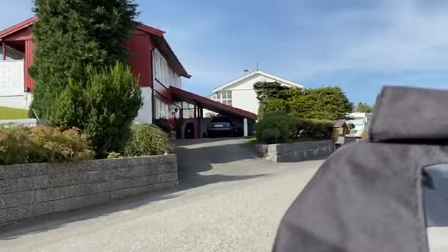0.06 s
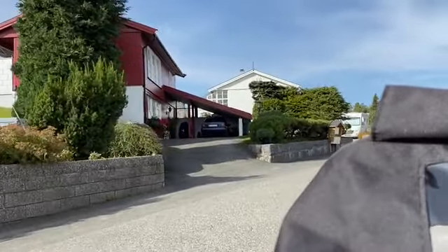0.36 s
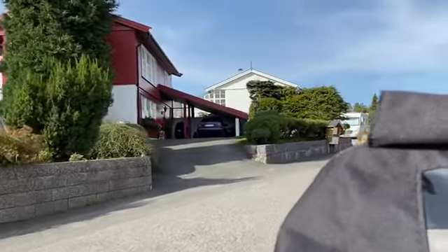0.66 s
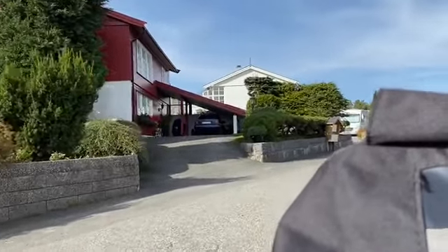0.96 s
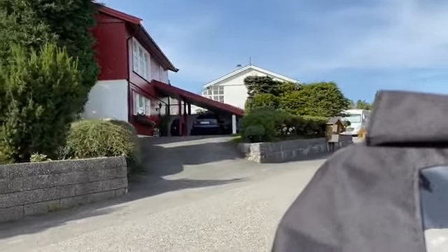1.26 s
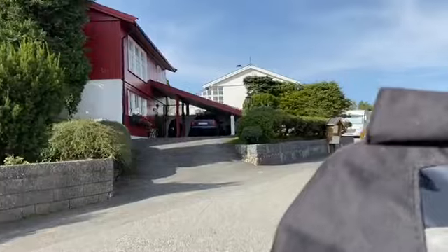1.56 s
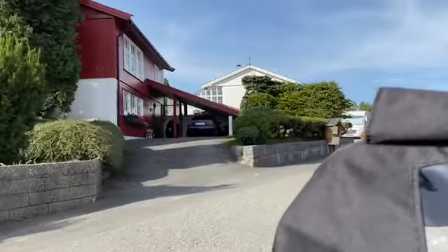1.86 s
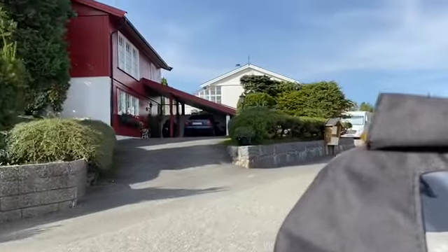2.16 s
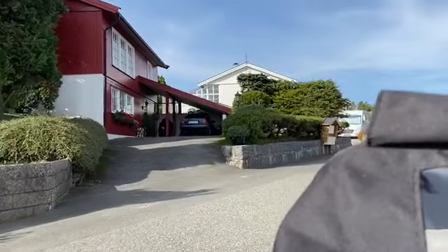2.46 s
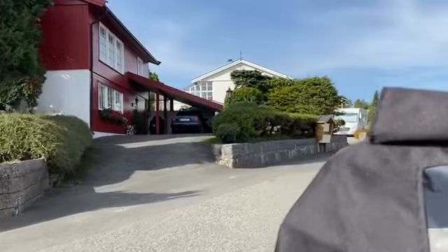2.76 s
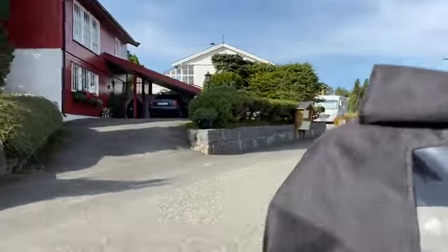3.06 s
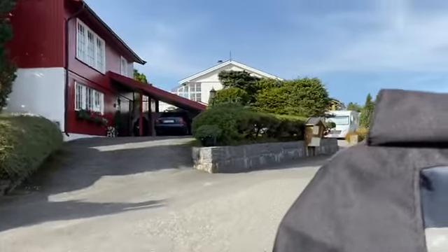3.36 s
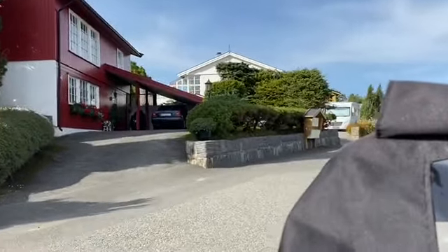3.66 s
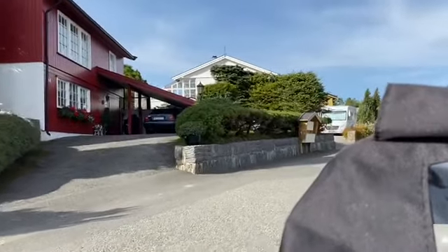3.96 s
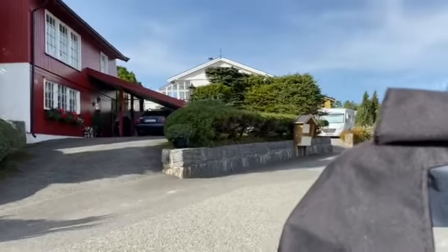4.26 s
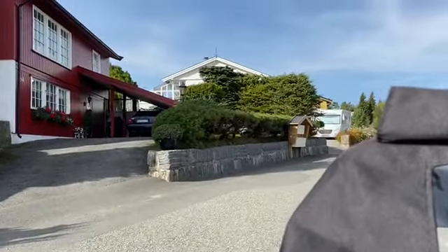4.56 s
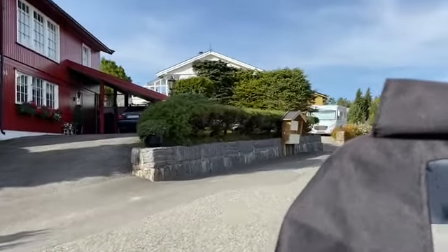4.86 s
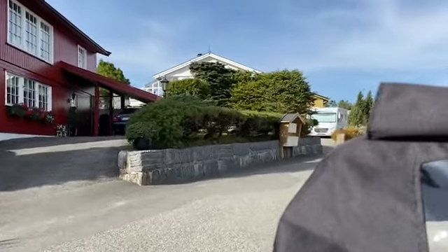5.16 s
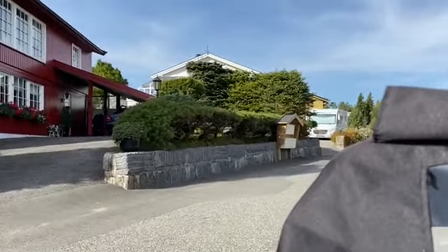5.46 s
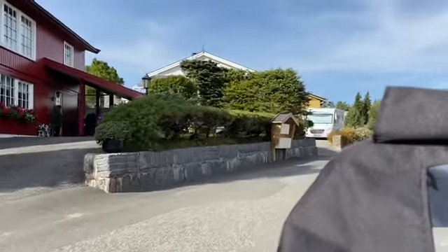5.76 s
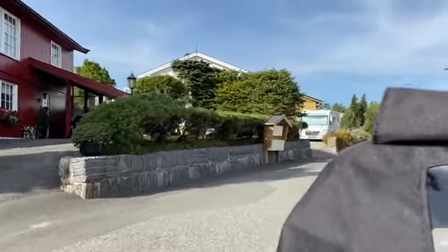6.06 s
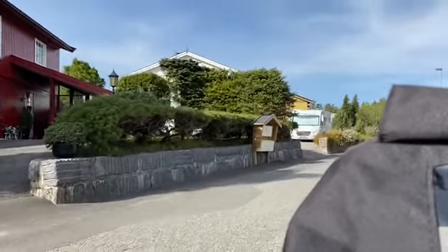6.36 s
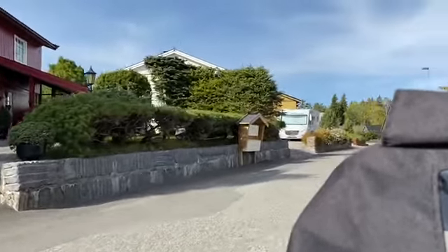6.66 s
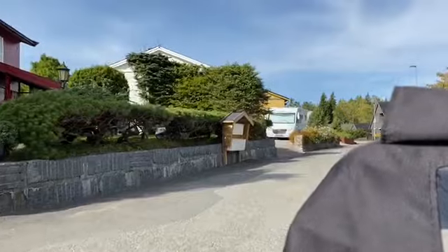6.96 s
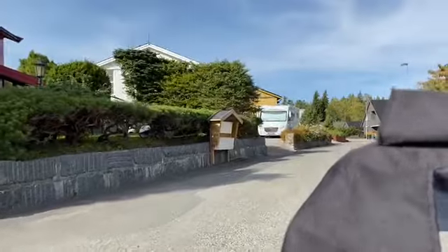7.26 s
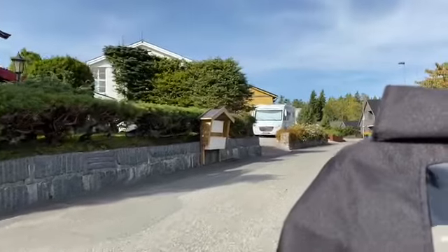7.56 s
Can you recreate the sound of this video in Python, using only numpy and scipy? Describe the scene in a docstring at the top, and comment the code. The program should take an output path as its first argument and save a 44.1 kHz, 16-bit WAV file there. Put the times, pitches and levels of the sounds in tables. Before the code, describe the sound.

A stroller rolls along a gritty asphalt lane in the open air. Grit crunches softly under its tyres and the shoes of the person pushing, with small pebbles popping and an occasional scuff. Stones send short, dry, irregular knocks through the frame, plastic joints click and loose wheel parts rattle lightly. Wind and the shaking chassis make a low rumble throughout. The microphone is close, just behind the hood.

```python
"""A gritty asphalt lane in the open air, the microphone just behind the hood of a moving stroller.
Close below, grit crunches and pebbles pop under tyres and shoes. Stones strike the wheels and send
short dry knocks through the frame; plastic joints click and creak, loose wheel parts rattle.
Underneath, wind buffets the microphone and the shaking chassis rumbles."""
import sys
import numpy as np
from scipy import signal
from scipy.fft import rfft, irfft
from scipy.io import wavfile
from scipy.ndimage import uniform_filter1d

SR = 44100
rng = np.random.default_rng(int(sys.argv[2]) if len(sys.argv) > 2 else 0)


def dump_mix(stems):
    """Bounce the given channels to the path in sys.argv[1] as a 16-bit WAV at rate SR."""
    frames = np.atleast_2d(stems).T  # one column per channel
    limited = np.clip(frames, -1, 1)  # hard clip at full scale
    pcm = np.round(limited * 32767).astype(np.int16)
    wavfile.write(sys.argv[1], SR, pcm)


N = 344906
TIME = np.arange(N) / SR


# tyres rolling on the bare lane: (time [s], crunch level [dB])
ROLLING = [(0.0, -68), (1.0, -66), (1.95, -66.5), (3.2, -65), (4.55, -68), (6.0, -69), (6.7, -65.5),
           (7.75, -68.5)]
# a sole or tyre crushes a patch of grit: (time [s], length [s], crunch [dB], patter re crunch [dB])
GRIT_PATCHES = [(0.0, 0.021, -56.5, -26), (0.181, 0.11, -58.5, 4), (0.332, 0.273, -60.5, 2),
                (0.651, 0.092, -57, 1), (1, 0.092, -65, 1), (1.254, 0.14, -60.5, 3.5),
                (1.444, 0.12, -63.5, 4.5), (1.666, 0.049, -61.5, -3), (2.111, 0.1, -58.5, 1.5),
                (2.378, 0.086, -66, 7), (2.632, 0.071, -61.5, 6), (2.803, 0.24, -59.5, 2.5),
                (3.04, 0.023, -54.5, -4), (3.098, 0.068, -57.5, -15), (3.263, 0.14, -62.5, 2),
                (3.566, 0.032, -63, 4.5), (3.778, 0.13, -62.5, 3.5), (4.007, 0.2, -66, -5),
                (4.256, 0.19, -62.5, 3.5), (4.601, 0.1, -64.5, -28), (4.844, 0.054, -59.5, 3),
                (4.915, 0.081, -61, 2), (5.015, 0.26, -63, -16), (5.349, 0.29, -64, 2.5),
                (5.712, 0.039, -62.5, -4), (5.848, 0.064, -66.5, 5), (6.113, 0.011, -61, -36),
                (6.294, 0.032, -66, 1), (6.4, 0.06, -65, 7.5), (6.894, 0.18, -64, 4),
                (7.22, 0.093, -61, -7), (7.427, 0.028, -64, 4.5)]
def treading(attack_s=0.031, release_s=0.037, sag_db_per_s=15, patter_rest_db=-69):
    """Envelopes of crunch and of patter: steady rolling plus patches of grit that yield when crushed."""
    crunch_power = gain_curve(ROLLING) ** 2
    patter_power = from_db(patter_rest_db) ** 2
    for start, length, level_db, patter_db in GRIT_PATCHES:
        press = swell(start, length, attack_s, release_s)
        on = press > 0
        press[on] *= from_db(level_db - sag_db_per_s * (TIME[on] - start))
        crunch_power += press ** 2
        patter_power += (from_db(patter_db) * press) ** 2
    return np.sqrt(crunch_power), np.sqrt(patter_power)


# coarse grit at close range: (frequency [Hz], level [dB])
GRIT_SPECTRUM = [(250, -14), (600, 1), (1000, 3.5), (1300, -5), (1900, 0), (2700, -3.5), (3500, -5),
                 (4800, -6), (6000, -11.5), (7200, -17), (10000, -57)]
# the finest sand: (frequency [Hz], level [dB])
SAND_SPECTRUM = [(1000, -8), (5000, -25), (6300, -8.5), (7000, -3), (8200, -9), (10500, -5.5),
                 (13000, -10.5), (16000, -11)]
def grit(crunch, coarse_db=4.5, sand_db=-2.0, clump_db=3.0):
    """Below the microphone, soles and tyres crush grains in clumps; the finest ones fizz."""
    clumps = from_db(clump_db * drift(110))
    mid, side = [scatter(grains(per_s=1500, spread_db=0.5), t60=0.011) for _ in range(2)]
    coarse = pan(colour(stereo(mid, side, side_db=-1.5), GRIT_SPECTRUM), left_db=3.5)
    diffuse = from_db(-14) * rng.standard_normal((2, N))
    sand = colour(from_right(grains(per_s=8000, spread_db=4.5)) + diffuse, SAND_SPECTRUM)
    return clumps * crunch * (from_db(coarse_db) * coarse + from_db(sand_db) * sand)


def pebbles(patter, level_db=-2.0, per_s=44, spread_db=1.5, low_hz=1500, high_hz=2900, pitches=7):
    """Pebbles pop out from under the tyres with a short ring, more often where the patter is strong."""
    pop_chance = per_s * np.sqrt(patter / patter.mean()) / SR
    hits = rng.random(N) < pop_chance
    pops = hits * from_db(spread_db * rng.standard_normal(N)) * patter / np.sqrt(pop_chance)
    pitch_index = rng.integers(0, pitches, N)
    out = np.zeros((2, N))
    for k, hz in enumerate(np.geomspace(low_hz, high_hz, pitches)):
        ringing = convolve(pops * (pitch_index == k), energy_one(soft_ring(hz, width_hz=400)))
        out += from_right(ringing, bearing=(.9, .3, .7)[k % 3])
    return from_db(level_db) * pan(out, left_db=2.5)


# a stone is pinched under a tyre or flicked away: (time [s], level [dB], pitch [Hz])
STONE_TICKS = [(0.0333, -33, 7600), (0.2714, -36, 3940), (0.372, -37, 6900), (0.3915, -48, 3100),
               (0.4674, -24, 2880), (0.9265, -45, 3450), (0.9672, -37, 2640), (1.0788, -37, 5450),
               (1.3237, -38, 4200), (1.477, -32, 2720), (1.6545, -43, 4200), (2.6312, -33, 4950),
               (2.6433, -31, 2950), (2.659, -40, 3880), (2.8042, -52, 4400), (2.868, -42, 2930),
               (3.0672, -38.5, 4830), (3.092, -37, 2100), (3.1302, -37.5, 5000), (4.679, -46, 3100),
               (5.062, -45, 4200), (5.0885, -47, 3320), (5.467, -45, 5030), (5.7252, -37, 3150),
               (6.4088, -46, 4250), (6.632, -42, 2950), (6.908, -46, 3400), (6.957, -49, 3920),
               (7.5165, -45.5, 3630)]
def stone_ticks(width_share=0.069):
    """A stone cracks over a wide band for an instant, then rings briefly at its own pitch."""
    out = np.zeros(N)
    for start, level_db, hz in STONE_TICKS:
        contact = chattering(rng.standard_normal(512), chatter_db=-16, t60=.006)
        crack = ring([(hz, hz / 2, 0)])
        stone = signal.fftconvolve(ring([(hz, width_share * hz, 0)]) + crack, crack)
        add(out, start, from_db(level_db) * peak_one(signal.fftconvolve(stone, contact)))
    return pan(from_right(out, bearing=0.75), left_db=8.0)


def chips(crunch, level_db=-6.5, low_hz=2520.0, high_hz=6260.0, pitches=11):
    """Left of the microphone, small stones tick against each other, the higher ones more softly."""
    ticks = grains(per_s=100, spread_db=2.3) * crunch
    pitch_index = rng.integers(0, pitches, N)
    out = np.zeros((1, N))
    for k, hz in enumerate(np.geomspace(low_hz, high_hz, pitches)):
        chip = energy_one(soft_ring(hz, width_hz=.2 * hz))
        out += convolve(ticks * (pitch_index == k), chip) * np.sqrt(low_hz / hz)
    return from_db(level_db) * pan(out, left_db=8.5)


# a sole scuffs the lane: (time [s], level [dB])
SCUFFS = [(0.318, -50), (1.173, -53), (1.361, -53.5), (3.038, -41), (3.104, -48), (4.862, -55), (4.92, -52),
          (6.39, -57), (7.283, -49.5)]
# coarse grit under a sole: (frequency [Hz], level [dB])
SCUFF_SPECTRUM = [(250, -2), (700, 15), (1100, 6.5), (1900, 7), (2700, -0.5), (5000, -10), (10000, -32)]
def scuffs(gain_db=0.5, attack_s=0.015, hold_s=0.0095, t60=0.097):
    """A step from the microphone, a sole drags grit for a moment; the last grains trail off."""
    drag = np.zeros(N)
    for start, level_db in SCUFFS:
        rise = np.clip((TIME - start) / attack_s + 1, 0, 1)
        drag += rise * from_db(level_db - 60 * np.maximum(TIME - start - hold_s, 0) / t60)
    mid, side = [grains(per_s=650, spread_db=-2.5) for _ in range(2)]
    return from_db(gain_db) * drag * colour(stereo(mid, side, side_db=-18.0), SCUFF_SPECTRUM)


# the bright snap of a grain or a joint: (frequency [Hz], level [dB])
SNAP_SPECTRUM = [(500, 0.96), (2500, 13), (4800, 10.4), (5900, 7.5), (7600, 15.5), (10000, 1.7),
                 (16000, 6.7)]
def cracks(crunch, level_db=-16.5):
    """Single grains crack with a thin, bright tick."""
    ticks = scatter(grains(per_s=20.0, spread_db=-7.0), t60=0.015)
    return from_db(level_db) * crunch * pan(colour(from_right(ticks), SNAP_SPECTRUM), left_db=2.0)


# a wheel meets a stone: (time [s], level [dB], hardness as treble re level [dB])
BUMPS = [(0.077, -38.5, -18), (0.579, -47, -8), (0.649, -41, -12), (0.69, -33, -27), (0.836, -32, -26.5),
         (1.003, -33.5, -13), (1.11, -35, -22.5), (1.326, -36.5, -16.5), (1.473, -34.5, -9),
         (1.518, -35.5, -9), (2.194, -30.5, -18), (2.22, -40, -13), (2.269, -38.5, -15),
         (2.809, -29.5, -24.5), (2.892, -31.5, -19), (3.038, -26, -20), (3.059, -34, 0),
         (3.107, -28.5, 1.5), (3.117, -35, -11), (3.263, -36, -9), (3.479, -41, -9), (4.451, -38, -13.5),
         (4.478, -45, -10), (4.53, -37, -22), (4.678, -39, -15.5), (4.822, -30, -33.5), (4.846, -34.5, 10),
         (4.876, -36, -22), (4.949, -32, -18), (4.978, -37, -18), (5.085, -38, -49), (5.16, -31.5, -26.5),
         (5.445, -34.5, -20.5), (5.523, -38, -32), (5.844, -32, -14), (5.898, -36, -19),
         (5.914, -36.5, -20), (6.008, -36.5, -33), (6.593, -32, -31), (6.628, -38, -16),
         (6.814, -36, -20.5), (6.92, -31.5, -28), (6.982, -38.5, -3.5), (7.092, -32.5, -23.5),
         (7.209, -30.5, 6.5), (7.248, -36, -15.5)]
def bumps(neutral_db=-10.0, echo_db=-10.5, thud_db=-19.0, thud_delay_s=0.0019):
    """Stones knock through the frame, each by its own path, with a dry thud; hard hits are brighter."""
    out = np.zeros(N)
    variations = rng.uniform((.65, .002, .8), (1.3, .012, 1.2), (len(BUMPS), 3))
    for (start, level_db, treble_db), (path, echo_s, pitch) in zip(BUMPS, variations):
        excess_db = treble_db - neutral_db
        hardness = from_db(0.1785 * excess_db)
        wave = bending_wave(top_hz=900 * pitch, bottom_hz=133.4, sweep_s=0.01239 * path / hardness,
                            tilt_db_per_octave=0.97 * excess_db)
        thud_band = signal.butter(2, [128, 484 * hardness], "band", fs=SR, output="sos")
        thud = rms_one(signal.sosfilt(thud_band, fade(rng.standard_normal(2048), t60=0.02)))
        add(out, start, from_db(level_db) * wave)
        add(out, start + echo_s, from_db(level_db + echo_db) * wave)   # reflection from a tube's end
        add(out, start + thud_delay_s, from_db(level_db + thud_db) * thud)
    roughness = 1 + .3 * drift(500)
    return from_right(out * roughness)


def bending_wave(top_hz, bottom_hz, sweep_s, tilt_db_per_octave):
    """High bending waves outrun low ones (delay ~ 1 / sqrt(Hz)): a blow arrives as a falling chirp."""
    t = TIME[:int(sweep_s * SR)]
    hz = top_hz / (1 + (np.sqrt(top_hz / bottom_hz) - 1) * t / sweep_s) ** 2
    envelope = np.sin(np.pi * np.sqrt(t / sweep_s)) * from_db(tilt_db_per_octave * np.log2(hz / top_hz))
    return envelope / envelope.max() * np.sin(2 * np.pi * (np.cumsum(hz) / SR + rng.random()))


def axle(gain_db=-9.5, hardness_share=0.94):
    """Bumps make the axle tube knock, hollow and short; the hardest ones stand out."""
    out = np.zeros(N)
    tube = soft_ring(hz=720.0, width_hz=127.0)
    for start, level_db, treble_db in BUMPS:
        add(out, start, from_db(level_db + gain_db + hardness_share * treble_db) * tube / tube.max())
    return from_right(out, bearing=.5)


def jolting(hardness_share=0.19, t60=0.3):
    """Envelope of the jolts: each bump puts energy into the chassis, more if hard, and it dies away."""
    blows = np.zeros(N)
    for start, level_db, treble_db in BUMPS:
        add(blows, start, from_db([level_db + hardness_share * treble_db]) ** 2)
    retained = from_db(-60 / (t60 * SR)) ** 2
    return np.sqrt(signal.lfilter([1], [1, -retained], blows))


# clicks of joints and cracking grit: (time [s], knock energy [dB], clack energy [dB], snap energy [dB])
CLICKS = [(0.27, -19, -24, -30), (0.371, -20.5, -16.5, -37), (0.4651, -10.5, -12, -21.5),
          (0.825, -29.5, -32, -23.5), (0.9681, -22, -26, -19.5), (0.9975, -27, -48, -24),
          (1.0788, -24, -33, -22.5), (1.477, -16, -17.5, -28), (1.6777, -24.5, -46, -30),
          (1.837, -33, -27, -56), (2.11, -26, -23.5, -36), (2.3781, -30, -27, -49.5),
          (2.6312, -21.5, -25, -10.5), (2.638, -30, -31, -22), (3.0622, -24, -29, -28),
          (3.1069, -22, -20, -50), (3.349, -22.5, -27.5, -26.5), (3.7767, -14, -16, -46),
          (3.8192, -34, -19, -37), (3.8274, -9, -7.5, -14.5), (3.8683, -22, -20.5, -30),
          (3.985, -27, -33, -28.5), (4.244, -31, -30, -31), (4.3867, -23, -67, -20),
          (4.8476, -37, -24, -48), (5.116, -26.5, -31, -27.5), (5.2442, -26, -34, -32),
          (5.702, -22, -35, -25), (7.2076, -28, -33, -54)]
# lower resonances of the plastic joints: (frequency [Hz], width [Hz], level [dB])
KNOCK_MODES = [(770, 240, 2), (1070, 240, 9), (1340, 350, 0)]
# their upper resonances: (frequency [Hz], width [Hz], level [dB])
CLACK_MODES = [(1560, 330, 4), (1950, 400, 6), (2750, 600, -3), (3750, 700, -8), (5360, 920, -16)]
def clicks(chatter_t60=.014, detune_db=0.5):
    """Close to the microphone, a sharp contact rings a joint at its own pitch and snaps in the treble."""
    joints, snaps = np.zeros((2, 2, N))
    for start, knock_db, clack_db, snap_db in CLICKS:
        noise = stereo(*rng.standard_normal((2, 1024)), side_db=1.0)
        contact = chattering(noise, chatter_db=-15.5, t60=chatter_t60)
        snap = chattering(noise, chatter_db=19.0, t60=chatter_t60)
        detune = from_db(detune_db * rng.uniform(-1, 1))
        for modes, energy_db in ((KNOCK_MODES, knock_db), (CLACK_MODES, clack_db)):
            ringing = convolve(contact, ring(modes, detune))
            add(joints, start, from_db(energy_db) * ringing / np.linalg.norm(ringing[0]))
        add(snaps, start, from_db(snap_db) * snap / np.linalg.norm(snap[0]))
    return pan(joints + colour(snaps, SNAP_SPECTRUM), left_db=-0.5)


# resonances of loose wheel parts: (frequency [Hz], width [Hz], level [dB])
RATTLE_MODES = [(950, 156, 13.5), (1860, 340, 1), (2017, 270, 8.5), (2620, 2700, -2)]
def rattle(patter, level_db=-3.0, detune_db=1.26, bearings=(.3, .9, .5, .8)):
    """Loose parts of four wheels patter unevenly to the right, each with its own pitch and bearing."""
    out = np.zeros((2, N))
    detunes = from_db(np.linspace(-detune_db, detune_db, len(bearings)))
    hub = ring([(2000, 1500, 0)])   # rounds off each tick
    for detune, bearing in zip(detunes, bearings):
        ticks = patter * grains(per_s=45, spread_db=3.0) / np.sqrt(len(bearings))
        part = energy_one(signal.fftconvolve(ring(RATTLE_MODES, detune), hub))
        out += from_right(convolve(ticks, part), bearing)
    return from_db(level_db) * pan(out, left_db=-11.0)


# a loose wheel part pings: (time [s], level [dB], pitch [Hz])
PINGS = [(0.181, -48, 2190), (0.2094, -46.5, 2070), (0.3555, -48, 2040), (0.4944, -48, 2460),
         (0.6767, -47, 2060), (1.1702, -53, 2150), (1.2356, -47, 2000), (1.701, -44.5, 2080),
         (1.7822, -50, 2000), (2.031, -48, 2140), (2.468, -46, 2140), (2.686, -47, 2150),
         (2.9329, -40.5, 2100), (3.163, -47, 2230), (3.224, -53, 2120), (4.018, -48, 2170),
         (4.033, -54, 2300), (4.047, -45.5, 2230), (4.064, -49, 2170), (4.278, -52, 2450),
         (4.336, -52, 2240), (4.359, -49, 2100), (4.824, -48.5, 2060), (4.925, -43, 2070),
         (5.156, -51, 2090), (5.236, -47, 2200), (5.623, -52.5, 2210), (5.713, -46, 2130),
         (5.774, -51, 2200), (5.822, -50, 2100), (5.887, -50, 2070), (6.046, -47.5, 2130),
         (6.243, -48, 2120), (6.275, -49, 2400), (6.29, -39.5, 2180), (6.354, -50, 2070),
         (6.722, -50, 2340), (6.924, -49, 2110), (7.003, -48, 2100), (7.032, -47, 2140), (7.384, -50, 2170),
         (7.421, -47, 2080), (7.65, -55, 2100), (7.662, -53, 2600)]
def pings(gain_db=2.0, width_hz=270.0, knock_hz=955.0):
    """A loose wheel part chatters against its hub: a short, gritty ping over a lower knock."""
    out = np.zeros(N)
    knock = ring([(knock_hz, width_hz / 2, 0)])
    for start, level_db, hz in PINGS:
        noise = rng.standard_normal(1024)
        part = signal.fftconvolve(ring([(hz, width_hz, 0)]), ring([(hz, 3 * width_hz, 0)]))
        ping = signal.fftconvolve(part, chattering(noise, chatter_db=-18, t60=.028))
        knock_db = -5.0 + 7.5 * noise[-1]   # varies by chance, usually weaker than the ping
        add(out, start, from_db(level_db) * peak_one(ping))
        add(out, start, from_db(level_db + knock_db) * knock / knock.max())
    return from_db(gain_db) * pan(from_right(out, bearing=-0.16), left_db=-0.5)


# the tread taps a hollow wheel hard: (time [s], level [dB])
WHEEL_TAPS = [(0.203, -46), (0.635, -43), (0.672, -46), (1.008, -42), (2.329, -47), (2.396, -40),
              (2.414, -44), (2.446, -44.5), (2.545, -43), (2.564, -50), (2.586, -46), (2.697, -51),
              (3.687, -45), (4.601, -44.5), (5.551, -45), (5.634, -49), (5.646, -52), (6.574, -48),
              (6.613, -46), (6.634, -45), (6.652, -48), (6.668, -46), (6.689, -49)]
def wheels(wheel_hz=1080, width_hz=130, tap_gain_db=1.0, faint_db=-67.5):
    """Down at the road, the tread taps the hollow wheels faintly; a hard tap goes on in a chatter."""
    taps = np.zeros(N)
    for start, level_db in WHEEL_TAPS:
        noise = rng.standard_normal(2048)
        hz = wheel_hz * from_db(.3 * noise[-1])
        shell = signal.fftconvolve(ring([(hz, width_hz, 0)]), ring([(hz, hz / 2, 0)]))
        tap = signal.fftconvolve(shell, chattering(noise, chatter_db=-24, t60=.07))
        add(taps, start, from_db(level_db + tap_gain_db) * peak_one(tap))
    faint = rms_one(convolve(grains(per_s=60.0, spread_db=4.0), soft_ring(wheel_hz, width_hz)))
    return pan(from_right(taps + from_db(faint_db) * faint, bearing=.8), left_db=-3.5)


# a joint of the frame creaks: (time [s], length [s], level [dB], pitch [Hz])
CREAKS = [(0.505, 0.0074, -52, 2550), (1.349, 0.073, -59, 1820), (2.922, 0.0037, -60, 1670),
          (4.411, 0.013, -51, 1900), (6.465, 0.0029, -47.5, 1780)]
def creaks(slips_per_s=500.0, width_hz=150.0, fade_s=0.0022):
    """Straight ahead of the microphone, a loaded joint sticks and slips in a short, uneven run."""
    slip_count = np.cumsum(slips_per_s * from_db(3 * drift(300))) / SR
    slips = np.diff(np.floor(slip_count), prepend=0) * from_db(2 * drift(300))
    out = np.zeros((1, N))
    for start, length, level_db, hz in CREAKS:
        joint = rms_one(convolve(slips, ring([(hz, width_hz, 0)])))
        out += from_db(level_db) * swell(start, length, fade_s, fade_s) * joint
    return from_right(out, bearing=0)


# the shaking frame under the microphone: (frequency [Hz], level [dB])
FRAME_SPECTRUM = [(60, -21.5), (120, -8.5), (165, 3.5), (240, -7), (320, -7), (500, -12.5), (750, -19),
                  (1000, -32.5), (1500, -30), (4000, -70)]
# resonances of the stroller's body: (frequency [Hz], width [Hz], level [dB])
BODY_MODES = [(157, 84, 11), (337, 34, -9.5)]
def frame(crunch, jolt, road_db=-49.5, jolt_db=-8, waves_db=2.0, boom_db=-2.0):
    """The rough road feeds tiny bending waves into the frame; hard shaking makes the body boom."""
    road_shake = from_db(road_db) * (crunch / crunch.mean()) ** 0.71
    vibration = np.hypot(road_shake, from_db(jolt_db) * jolt)
    contacts = stereo(grains(per_s=260, spread_db=3.0), grains(per_s=700, spread_db=2.0), side_db=-7.5)
    hz = np.fft.rfftfreq(4096, 1 / SR)
    dispersion = irfft(np.exp(-4j * np.pi * .16 * np.sqrt(hz)))   # low waves arrive last
    waves = rms_one(colour(convolve(contacts, dispersion), FRAME_SPECTRUM))
    boom = (vibration / vibration.mean()) ** 0.25 * convolve(rng.standard_normal(N), ring(BODY_MODES))
    return vibration * (from_db(waves_db) * waves + from_db(boom_db) * boom)


# the chassis drops into a dip in the lane: (time [s], level [dB])
LURCHES = [(0.419, -27), (3.053, -28), (3.549, -24.5)]
def lurches(sway_hz=60.5, length_s=0.049):
    """The whole chassis rocks on its springs for a few cycles."""
    out = np.zeros(N)
    t = TIME[:int(length_s * SR)]
    rocking = np.sin(np.pi * t / length_s) * np.sin(2 * np.pi * sway_hz * t)
    for start, level_db in LURCHES:
        add(out, start, from_db(level_db) * rocking)
    return out


# wind and chassis rumble at the microphone: (time [s], level [dB])
RUMBLE_LEVELS = [(0.0, -38.5), (0.76, -37), (0.84, -47), (0.98, -34), (1.18, -39), (1.56, -35),
                 (1.68, -39.5), (2.13, -35.5), (2.24, -36), (2.44, -39.5), (2.86, -36.5), (2.94, -39.5),
                 (3.08, -33.5), (3.32, -38), (3.6, -35), (3.68, -38), (4.76, -37.5), (5.62, -39),
                 (5.74, -35), (6.04, -39), (6.3, -34.5), (6.86, -36.5), (7.02, -39.5), (7.2, -35.5),
                 (7.82, -39)]
# its deep tone colour: (frequency [Hz], level [dB])
RUMBLE_SPECTRUM = [(15, -38), (25, -12), (38, -9.5), (52, -1.5), (68, -1), (85, -7), (110, -10.5),
                   (140, -20), (200, -28), (1000, -87)]
def rumble(jolt, gain_db=1.23, gust_db=2.5, gusts_per_s=11.0, sway_db=-8.0, steady_s=0.1094):
    """Wind buffets both sides of the microphone much alike; the chassis sways after each bump."""
    mid, side = colour(rng.standard_normal((2, N)), RUMBLE_SPECTRUM)
    steady_mid = mid / np.sqrt(uniform_filter1d(mid ** 2, int(steady_s * SR)) + 1e-9)
    wind = gain_curve(RUMBLE_LEVELS) * from_db(gain_db + gust_db * drift(gusts_per_s))
    return np.hypot(wind, from_db(sway_db) * jolt) * stereo(steady_mid, side, side_db=-12.0)


def from_db(db):
    return 10 ** (np.asarray(db) / 20)


def rms_one(x):
    return x / np.sqrt(np.mean(x ** 2) + 1e-20)


def peak_one(x):
    return x / np.abs(x).max()


def energy_one(x):
    return x / np.linalg.norm(x)


def add(track, start_s, sound):
    start = max(int(start_s * SR), 0)
    track[..., start:start + sound.shape[-1]] += sound[..., :N - start]


def gain_curve(rows):
    """A level curve as a gain at every sample."""
    return from_db(np.interp(TIME, *np.transpose(rows)))


def swell(start, length, attack_s, release_s):
    """Envelope that rises until start, holds and falls again."""
    return np.interp(TIME, np.cumsum([start - attack_s, attack_s, length, release_s]), [0, 1, 1, 0])


def fade(x, t60):
    """Dies away by 60 dB in t60 seconds."""
    return x * from_db(-60 * TIME[:x.shape[-1]] / t60)


def drift(per_s):
    """Glides between random values of spread 1."""
    knots = rng.standard_normal(4000)
    return np.interp(TIME * per_s, np.arange(len(knots)), knots)


def grains(per_s, spread_db):
    """Random contacts; a few are much larger than the rest, or smaller if the spread is negative."""
    hits = rng.random(N) < per_s / SR
    sizes = from_db(spread_db * np.minimum(rng.exponential(1, N), 4))
    return rms_one(hits * sizes * rng.choice([-1, 1], N))


def chattering(noise, chatter_db, t60):
    """One sharp contact followed by dying chatter."""
    return signal.unit_impulse(noise.shape[-1]) + from_db(chatter_db) * fade(noise, t60)


def scatter(contacts, t60):
    """Each contact breaks into a brief burst with even energy at all pitches."""
    burst = fade(rng.standard_normal(2048), t60)
    return convolve(contacts, irfft(np.exp(1j * np.angle(rfft(burst)))))


def ring(modes, detune=1):
    """Impulse response of parallel resonances (Hz, width in Hz, dB) of alternating sign, unit energy."""
    t = TIME[:2048]
    response = np.zeros(len(t))
    for k, (hz, width_hz, db) in enumerate(modes):
        envelope = from_db(db) * width_hz * np.exp(-np.pi * width_hz * t)
        response += (-1) ** k * envelope * np.sin(2 * np.pi * hz * detune * t)
    return energy_one(response)


def soft_ring(hz, width_hz):
    """A resonance passed through itself, which rounds its attack."""
    mode = ring([(hz, width_hz, 0)])
    return signal.fftconvolve(mode, mode)


def convolve(x, response):
    return signal.oaconvolve(np.atleast_2d(x), response[None], axes=1)[:, :N]


def colour(x, spectrum, size=8192):
    """Causal (minimum-phase) filter of unit energy with the given spectral shape."""
    hz, db = np.transpose(spectrum)
    grid = np.maximum(np.fft.rfftfreq(size, 1 / SR), 1)
    magnitude = from_db(np.interp(np.log(grid), np.log(hz), db))
    cepstrum = irfft(np.log(magnitude))
    cepstrum[1:size // 2] *= 2
    cepstrum[size // 2 + 1:] = 0
    return convolve(x, energy_one(irfft(np.exp(rfft(cepstrum)))))


def stereo(mid, side, side_db):
    return (mid + from_db(side_db) * side * np.array([[1], [-1]])) / np.hypot(1, from_db(side_db))


def pan(x, left_db):
    return x * from_db(np.array([[left_db], [-left_db]]) / 2)


def from_right(x, bearing=1, full_lag_s=.00027):
    """Sound reaches the microphone's left side later (bearing 0 ahead, 1 fully right, negative left)."""
    x = np.ravel(x)
    return np.array([np.interp(TIME - bearing * full_lag_s, TIME, x), x])


def scene():
    """Lane, stroller and wind, all close to the microphone and in the open air."""
    crunch, patter = treading()
    jolt = jolting()
    chassis = frame(crunch, jolt) + bumps() + axle() + lurches()
    small_parts = clicks() + rattle(patter) + pings() + creaks() + wheels()
    lane = grit(crunch) + scuffs() + pebbles(patter) + stone_ticks() + chips(crunch) + cracks(crunch)
    return lane + chassis + small_parts + rumble(jolt)


def record(dry, cutoff_hz=15900):
    """The highest treble is cut steeply."""
    return signal.sosfilt(signal.ellip(10, .1, 80, cutoff_hz, fs=SR, output="sos"), dry)


dry = scene()
out = record(dry)
dump_mix(out)
```